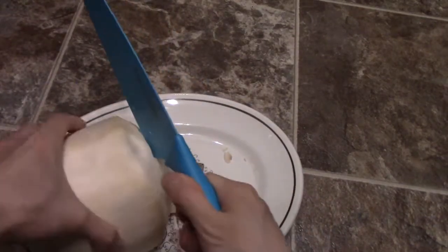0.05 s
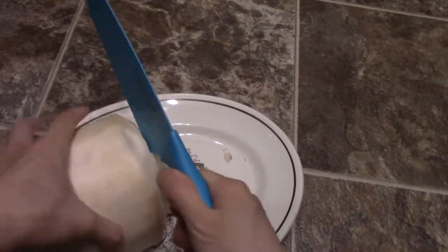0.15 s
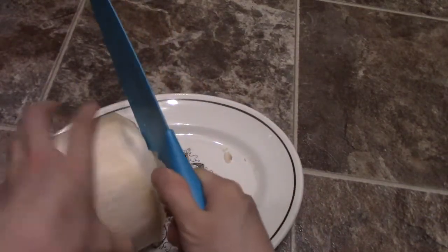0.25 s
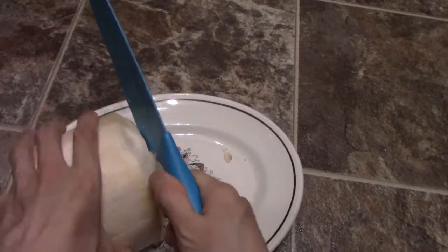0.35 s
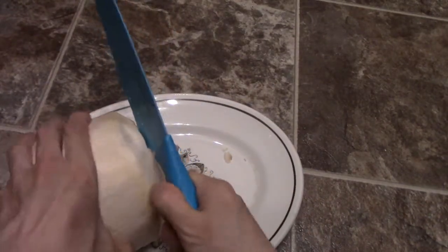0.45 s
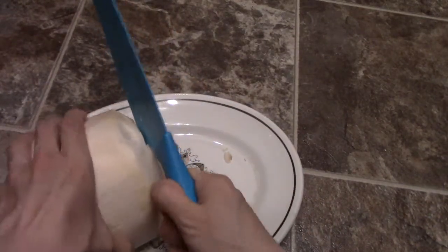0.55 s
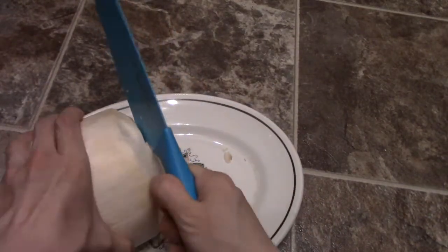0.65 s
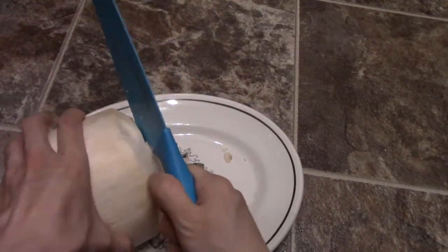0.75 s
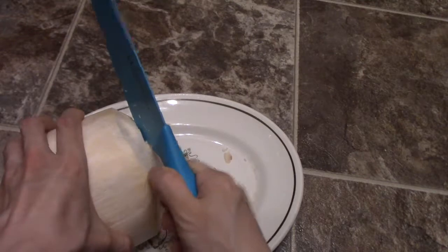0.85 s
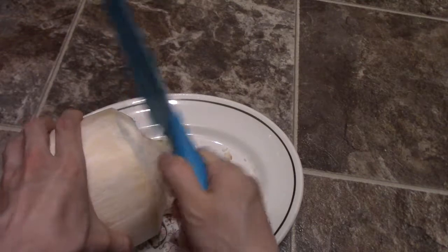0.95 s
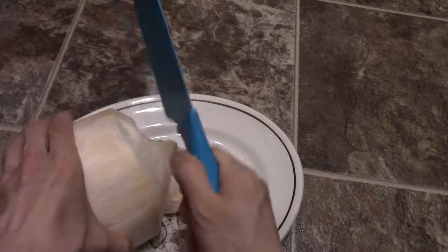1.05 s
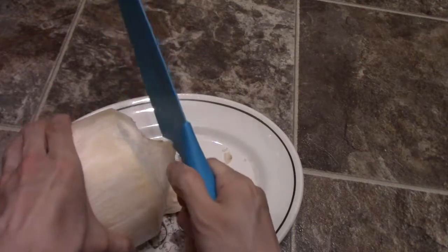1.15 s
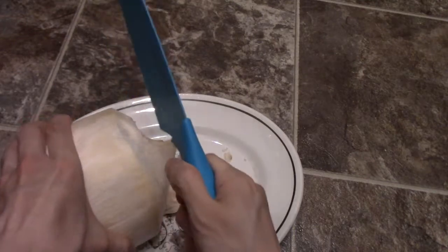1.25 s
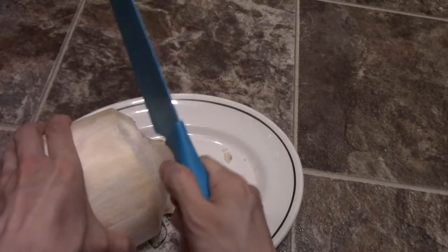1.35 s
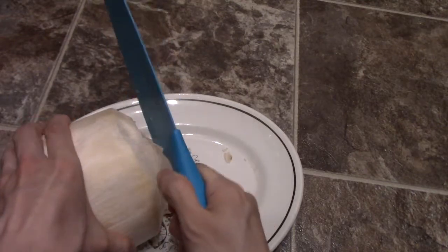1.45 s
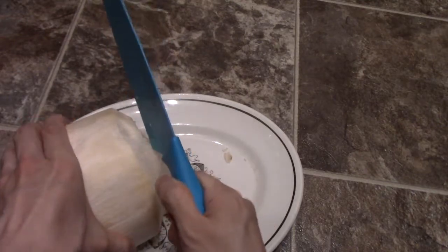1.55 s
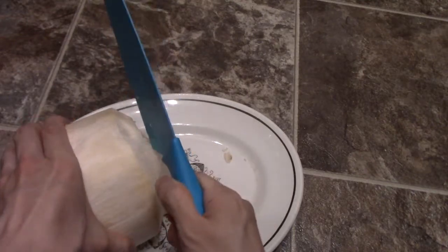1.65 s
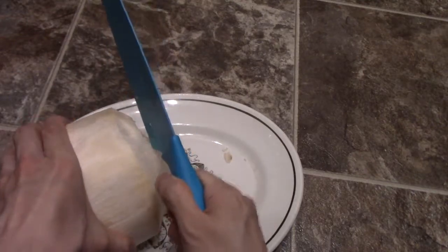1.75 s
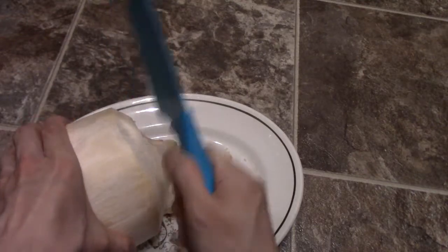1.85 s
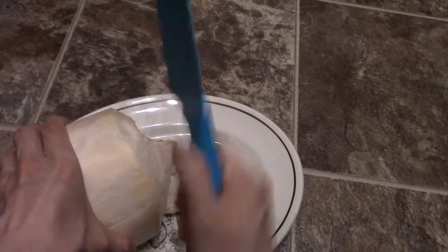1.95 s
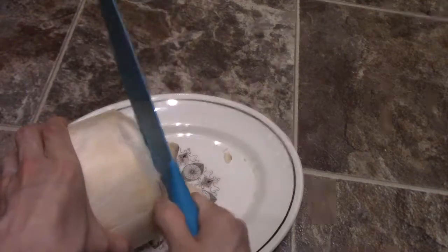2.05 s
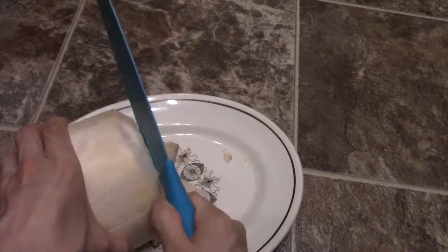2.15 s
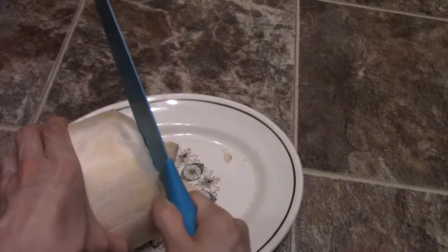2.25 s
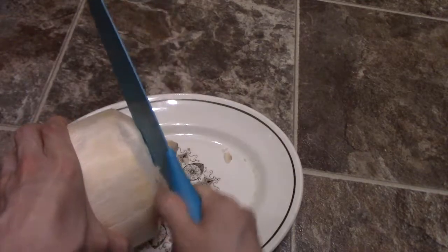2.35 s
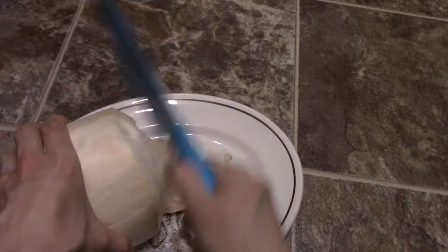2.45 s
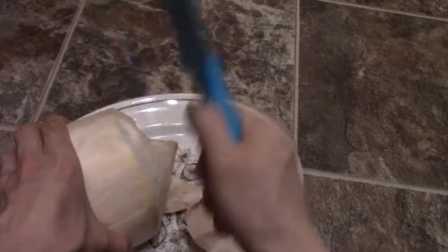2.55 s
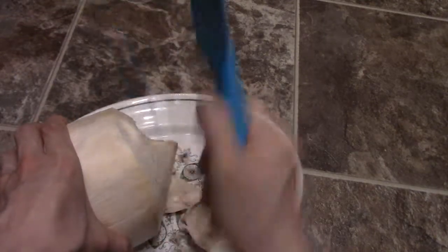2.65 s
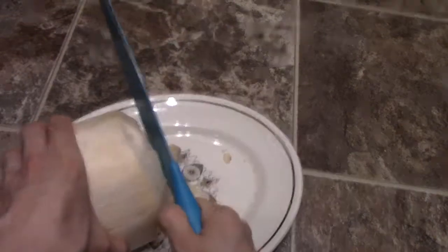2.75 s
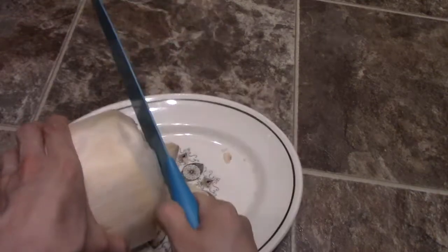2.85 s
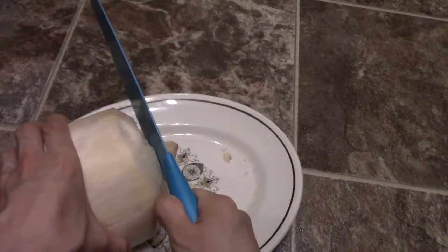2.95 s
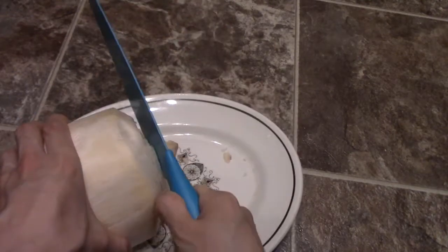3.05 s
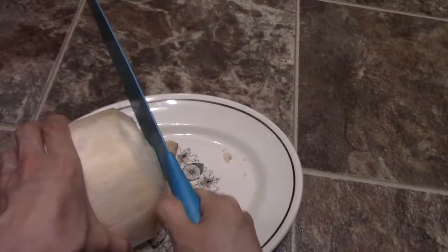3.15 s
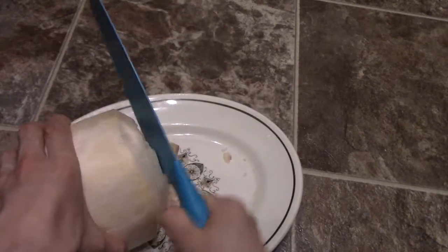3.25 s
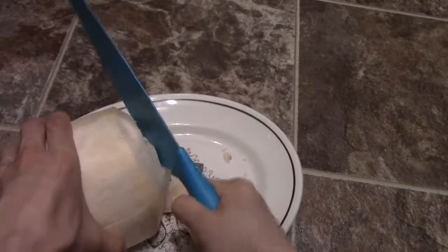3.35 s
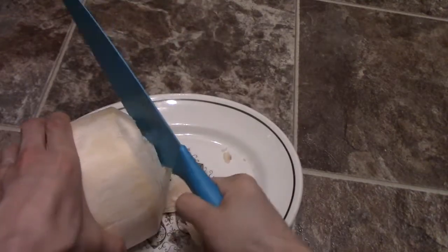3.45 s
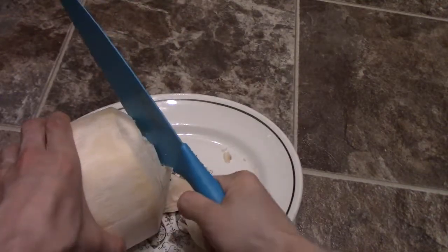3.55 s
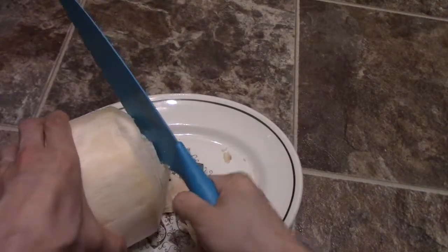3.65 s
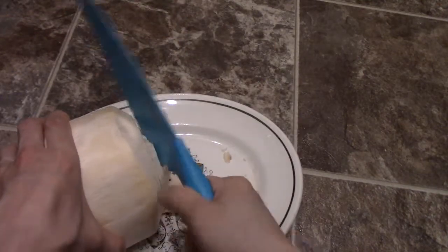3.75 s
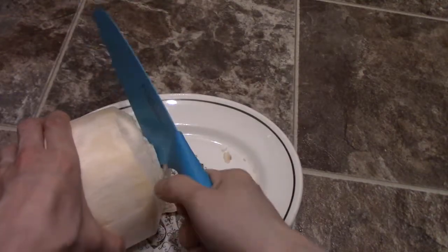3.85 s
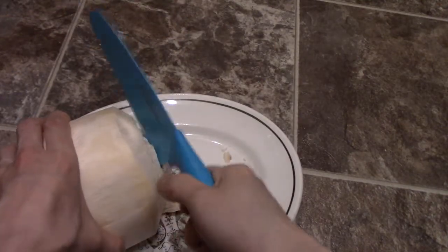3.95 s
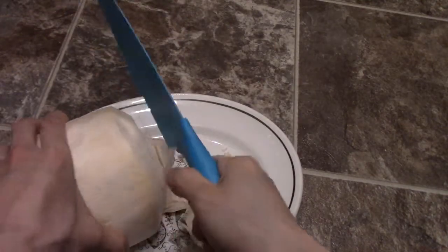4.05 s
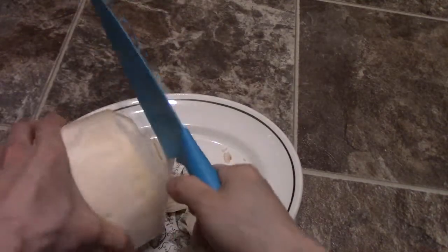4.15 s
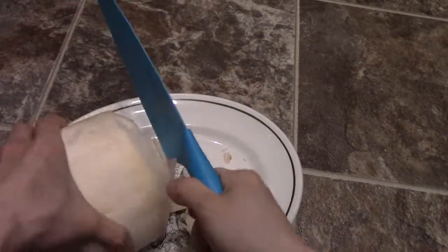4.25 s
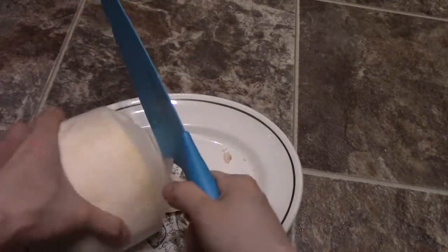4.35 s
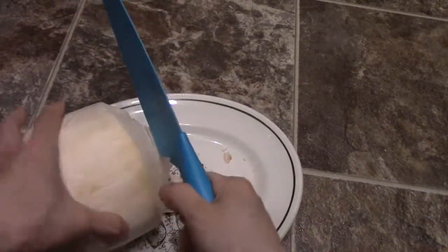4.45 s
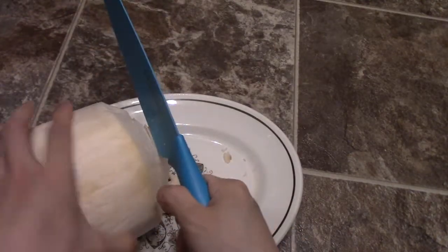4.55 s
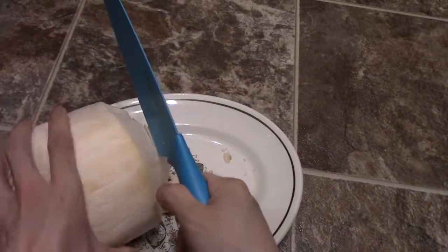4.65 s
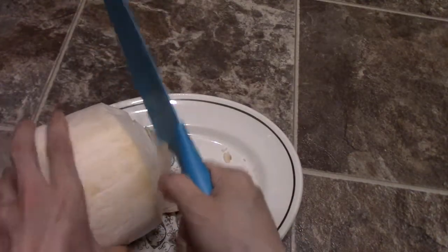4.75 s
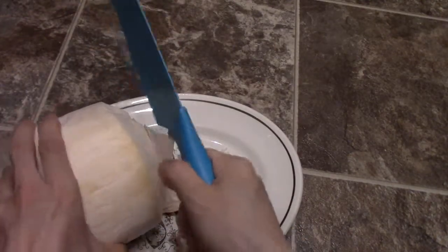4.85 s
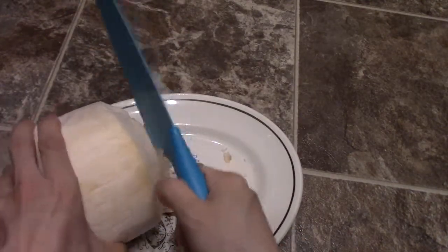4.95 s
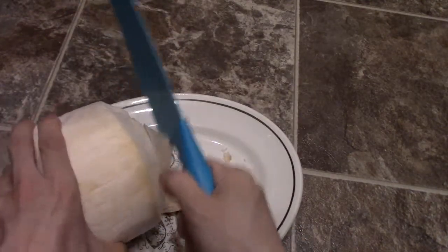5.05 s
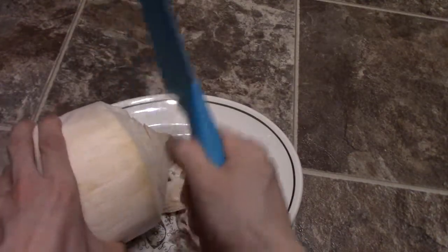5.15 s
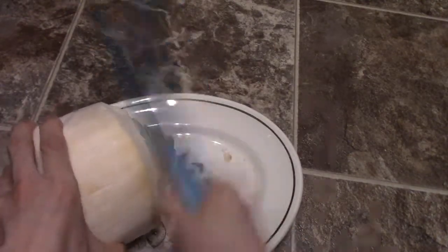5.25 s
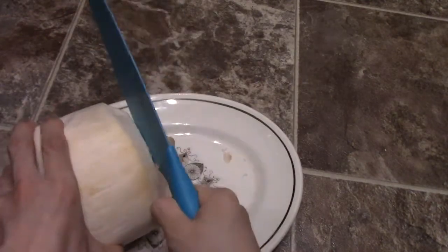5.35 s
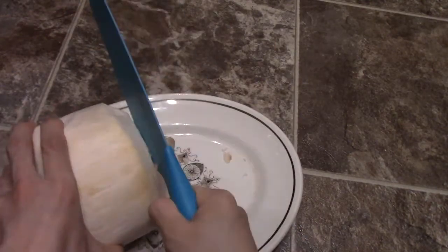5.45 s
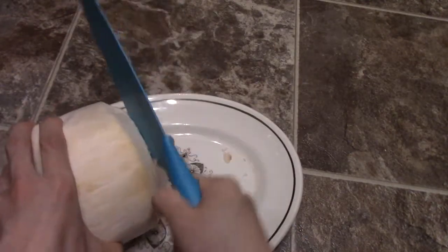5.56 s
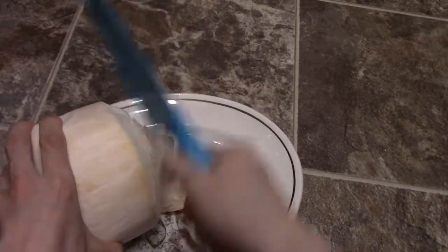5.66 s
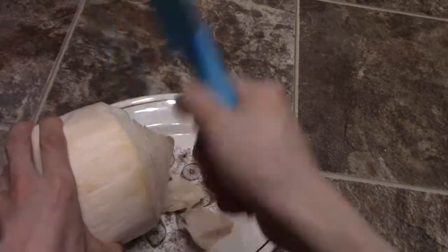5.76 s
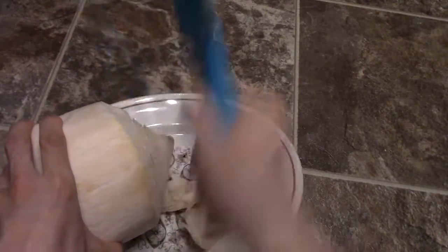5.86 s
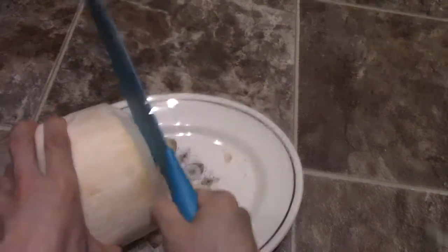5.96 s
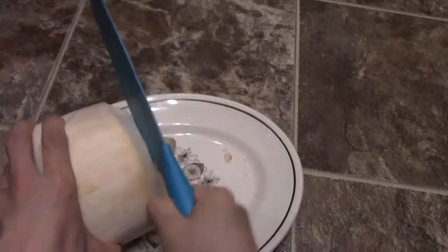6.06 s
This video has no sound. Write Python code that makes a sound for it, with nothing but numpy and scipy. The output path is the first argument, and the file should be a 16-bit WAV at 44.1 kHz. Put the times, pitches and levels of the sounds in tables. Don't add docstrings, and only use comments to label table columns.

```python
import sys
import numpy as np
from scipy import signal
from scipy.fft import rfft, irfft
from scipy.io import wavfile
from scipy.ndimage import uniform_filter1d

SR = 44100
rng = np.random.default_rng(int(sys.argv[2]) if len(sys.argv) > 2 else 0)


def boost(x):
    u = np.asarray(x, float) / 20
    return 10 ** u


def digitize_waveform(pressure):
    field = np.atleast_2d(pressure).T
    bounded = np.clip(field, -1, 1)
    quanta = np.round(bounded * 32767).astype(np.int16)
    wavfile.write(sys.argv[1], SR, quanta)


N = 268569

# t/s, bite time/s, cut length/s, delay until the nut lands on the plate/s
BLOWS = [
    (1.9565, .0035, .0045, .027),
    (2.67, .0006, .0085, .022),
    (5.2135, .005, .0065, .028),
    (5.8585, .005, .0065, .0275),
]
# tearing level/dB, cut tilt/dB per octave, room tail level/dB,
# tail tilt/dB per octave, share of the tail set off by the landing/0-1
FORCES = [(-6, 3, -21, 0.5, 0.3), (-6, 2.5, -19.5, 3, 0.17), (-3, 1.4, -12.5, -1.45, 0.3),
          (-3, 1.2, -7, -0.7, 0.68)]
# f/Hz, level/dB, t60/s
THUMPS = [
    [(80.3, -17, .25), (100.4, -8.5, 0.3), (138.3, -12.5, 0.29), (166.3, -2.5, 0.17), (306.7, -11.5, 0.19),
     (458.4, -14, 0.21), (589, -19.5, 0.14), (639, -19.5, .12), (390, -21.5, .2)],
    [(78, -16.5, .25), (94.5, -6, 0.32), (138.6, -9, 0.28), (168.6, -4.5, 0.16), (301, -18, .25),
     (334, -16.5, .18), (424.4, -19, 0.22), (479.4, -21, .25), (585, -28, 0.2)],
    [(96, -10.5, 0.33), (165.3, 3.5, 0.3), (236.4, -13, 0.31), (312.4, -6.5, 0.25), (358.5, -8.5, 0.21),
     (449, -8.5, 0.21), (484, -12.5, 0.23), (398, -12.5, 0.21), (529, -11, 0.14)],
    [(100.4, -9, 0.29), (165.5, 4.5, 0.26), (244, -14, 0.29), (305.5, -2, 0.19), (377, -8.5, 0.29),
     (434.5, -3, 0.23), (481, -9, 0.25), (529.5, -7, 0.16), (587, -14, 0.24), (339.5, -11, .2)],
]
# f/Hz, level/dB, t60/s
PLATES = [
    [(1046, -6, 0.087), (1550, -2.5, 0.071), (2028, -8, 0.29), (1874, -11, .1), (2186, -14, .2),
     (2690, -15, 0.13)],
    [(1173, -19, 0.263), (1764, -9, 0.21), (1960, -13, .25), (2030, -7, 0.26), (2105, -8, 0.24),
     (1475, -12.5, .25), (2503, -14, .2), (3000, -12.5, 0.14)],
    [(960, 0, 0.16), (1230, -17, 0.56), (1566, 4, 0.16), (1728, -6, 0.21), (2026, -7, 0.4),
     (3050, -17, 0.24), (4160, -14, .15)],
    [(1210, -8, 0.42), (1416, 4, 0.15), (1700, -0.5, 0.29), (2028, 2.5, 0.32), (2900, -19, 0.33),
     (4050, -14, 0.2), (980, 0, .2), (1580, -1, .2)],
]
# f/Hz, level/dB per Hz
TEAR_SPECTRUM = [(290, -24), (500, -24), (834, 4), (1890, -1), (4170, -4.5), (4760, -8.5), (8420, -4.5),
                 (13200, -14.5), (14900, -20), (15800, -22.5), (16500, -32)]
# f/Hz, level/dB
BOOM_SPECTRUM = [(50, -38.5), (90, 1.5), (170, 11.5), (250, -8), (320, -4), (450, 1.5), (600, -13.5),
                 (900, -50)]
# f/Hz, level/dB per Hz
TAIL_SPECTRUM = [(350, -28.5), (600, -3), (1120, -10), (1560, -7.5), (1840, -15), (2000, -8), (3350, -18.5),
                 (6980, -18.5), (14200, -27.5), (15000, -33), (15600, -58.5)]
# f/Hz, t60/s
ROOM_DECAY = [(700, 0.27), (1800, 0.27), (4500, 0.26), (8000, 0.2), (11000, .165), (14000, 0.12),
              (16500, .07)]
# t/s, peak level/dB, centre f/Hz, t60/s
KNOCKS = [(1.9689, -14.5, 2360, 0.041), (1.975, -20, 5800, 0.033), (1.984, -19, 2000, 0.036),
          (2.674, -10, 9000, 0.02), (2.6766, -11.5, 2040, 0.033), (2.671, -12, 1550, 0.037),
          (2.6885, -21, 2500, .03), (2.683, -19, 2430, 0.044), (2.693, -28.5, 6160, 0.018),
          (5.218, -3, 2200, 0.013), (5.2426, -9.5, 1470, 0.057), (5.249, -15, 1100, .05),
          (5.864, 2, 4800, 0.0039), (5.869, -24, 4000, 0.022), (5.886, -14, 1420, 0.07),
          (5.8897, -7, 2000, 0.06), (5.891, -26, 6500, .04), (5.905, -30, 1900, .04),
          (5.919, -19, 1200, 0.046), (5.957, -27, 1500, 0.03), (6.078, -43.5, 8650, .12),
          (6.087, -36, 3000, 0.024)]
# t/s, peak level/dB, f/Hz, t60/s
CHINKS = [(2.6748, 3.5, 7700, 0.0027), (2.6925, -15.5, 6140, .03), (2.706, -20, 2000, .03),
          (2.7145, -17, 2050, .03), (2.728, -20, 2050, .04), (1.9755, -22, 5900, .02),
          (2.054, -54, 11500, .015), (5.232, -30, 9200, .06), (5.294, -44, 9200, .04),
          (5.293, -54, 13800, .03), (5.869, -30, 12200, .06), (5.872, -32, 14000, .06),
          (5.872, -29, 9300, .09), (5.8695, -23, 5500, .02), (5.8945, -11, 1600, .04),
          (5.908, -36, 9300, .06), (5.908, -44, 13200, .03), (5.929, -40, 9300, .04),
          (5.9395, -34, 9300, .045), (5.939, -49, 13600, .05), (5.957, -39, 8000, .02),
          (6.083, -35, 3500, .06), (3.897, -54, 10500, 0.044), (3.9, -53, 5600, .04),
          (4.132, -50, 5200, .03), (4.128, -50, 2500, .05), (4.158, -59, 9500, .12),
          (.5695, -61, 9070, .06)]
# t/s, peak level/dB, note level against the click/dB, note f/Hz, note t60/s
TOUCHES = [(0.2345, -46, 9, 2160, 0.079), (0.2623, -36.5, -6, 3900, .04), (1.1994, -53, -1, 2130, .015),
           (1.4294, -59, 9, 4160, .04), (2.054, -48, 0, 2640, .02), (3.1233, -55, 11, 3000, .006),
           (3.2731, -18.5, -11, 2780, 0.0079), (3.4109, -32, -9, 2700, 0.011), (3.42, -33, -4, 2800, .012),
           (3.4285, -31.5, -8, 2720, 0.011), (3.6496, -34, 5, 1500, 0.0028),
           (3.6504, -37.5, 3, 3930, 0.0071), (3.723, -43, -1, 4040, 0.074), (3.7894, -52.5, 7, 2150, .015),
           (4.0728, -42.5, 3.5, 2400, 0.011), (4.152, -52, 4, 2560, .015), (4.335, -62, 8, 3900, 0.057),
           (4.906, -39, -7, 3880, .12), (4.934, -51, -2, 3880, .03), (5.3965, -47, -6, 2260, .02),
           (5.4595, -50, 12, 4480, .004), (6.018, -47, 2, 2100, .015)]
# t/s, peak level/dB, centre f/Hz
SNAPS = [(0.503, -51, 11500), (0.5114, -51, 10000), (2.922, -53, 9140), (0.8124, -50, 8930),
         (0.8274, -50, 9430), (1.498, -53, 10500), (1.912, -48, 7340), (2.2518, -50.5, 9050),
         (2.2843, -50, 9560), (2.2956, -46, 9400), (2.3064, -33, 10100), (2.3352, -49, 8840),
         (2.3803, -43, 8790), (2.967, -50, 12500), (3.2095, -43, 9500), (3.259, -43, 12800),
         (3.276, -30, 9550), (3.3283, -39.5, 7540), (3.4944, -44, 8750), (3.5084, -46, 9300),
         (3.656, -36, 6800), (4.294, -47, 7700), (4.4286, -55, 10500), (4.561, -53.5, 9460),
         (5.469, -51, 9500), (5.498, -49, 9600), (5.5189, -43, 6950), (5.5874, -54, 8940),
         (.2688, -50, 12500), (.7408, -55, 9000), (2.3212, -50, 9000), (2.4659, -60, 12500),
         (2.5078, -55, 9500), (2.5732, -56, 9500), (2.9932, -53, 9000), (3.1503, -51, 9500),
         (3.2541, -43, 8500), (3.2805, -40, 12500), (3.3803, -55, 8500), (3.4606, -50, 8500),
         (3.4736, -52, 8500), (3.6567, -46, 13500), (3.7839, -58, 13000), (3.8662, -55, 8500),
         (3.9026, -50, 10000), (4.1571, -52, 9000), (4.326, -55, 10000), (4.5097, -55, 10500),
         (4.636, -52, 8500), (4.9323, -52, 10970), (6.0458, -53, 9000)]
# middle t/s, level/dB, centre f/Hz, length/s
SWISHES = [(0.155, -64.5, 5000, 0.16), (0.252, -50.5, 5700, 0.033), (0.253, -50, 2070, 0.044),
           (.36, -62.5, 4500, 0.074), (0.821, -65, 9500, 0.034), (0.989, -68, 9000, 0.037),
           (2.36, -54.5, 8800, 0.022), (3.148, -64, 8500, 0.035), (3.238, -56, 8500, 0.051),
           (3.289, -49, 7360, 0.032), (3.418, -59, 9000, 0.02), (3.493, -67, 9000, 0.045),
           (3.652, -45, 1780, 0.011), (3.715, -56.5, 7900, 0.062), (3.896, -59, 10400, 0.022),
           (4.051, -57.5, 5530, 0.14), (4.076, -47.5, 7460, 0.0081), (4.101, -54, 1540, 0.081),
           (4.175, -64, 8400, 0.046), (4.295, -64, 8000, 0.068), (4.388, -65.5, 7900, .06),
           (4.17, -74, 14500, .08), (4.39, -73, 14500, .08), (.14, -72, 14500, .05),
           (4.908, -55, 9000, 0.0099), (4.92, -65, 7000, 0.035), (5.473, -56, 4800, 0.029),
           (5.548, -57, 8300, 0.05)]
# t/s, level/dB, dullness/0-1
RUB = [(0.0, -75, 0.3), (.23, -70, .8), (.94, -76.5, .1), (1.93, -75, 0.2), (2.64, -76, 0.56),
       (3.35, -71.5, 0.24), (4.2, -75, 1), (5.19, -77.5, 0.37), (6.0, -77, .5), (6.09, -60, .6)]
# t/s, peak level/dB, f/Hz
SHOVES = [(0.266, -65, 72.7), (1.518, -66, 83.4), (2.229, -63, 87), (2.358, -68, 106), (2.933, -64, 83.3),
          (4.084, -57, 90), (4.923, -53, 90), (5.58, -64, 96)]
# multiple of the motor speed, rms level/dB
MOTOR_ORDERS = [(1, -54), (2, -46), (3, -63), (4, -58.5), (5, -68.5)]
# f/Hz, rms level/dB
MAINS = [(60, -84), (120, -59.5)]
# f/Hz, level/dB per Hz
FAN_SPECTRUM = [(18, -36), (30, -34.5), (95, -17.5), (118, -15), (194, -12), (221, -9), (252, -5),
                (355, -10.5), (473, -3), (632, -16), (1220, -22.5), (2830, -30), (5740, -41.5),
                (13000, -54), (16000, -69)]
# f/Hz, width/Hz, rms level/dB
CASE = [(190.3, 3.2, -56.5), (313.6, 16, -51), (360, 8.2, -58.5), (461.6, 21, -50.5), (971, 83.4, -57),
        (1253.6, 19, -63), (1468, 39, -66), (1690, 72, -63.5), (2000, 18, -69.5), (5725, 140, -75),
        (5460, 950, -68), (9070, 80, -82.5)]
# f/Hz, likeness/0-1
NUT_SAME = [(60, 1), (125, .9996), (500, 1), (2000, 0.99), (4000, 0.96), (8000, 0.975), (16000, 0.86)]
# f/Hz, likeness/0-1
FRIDGE_SAME = [(60, 1), (180, 0.99), (550, 1), (1650, 0.95), (4970, 0.89), (15000, 0.76)]
# f/Hz, side level/dB
NUT_LEAN = [(60, -37.5), (500, -44), (2000, -33.5), (8000, -26), (15000, -28.5)]
# f/Hz, side level/dB
FRIDGE_LEAN = [(60, -33), (15000, -34)]


def evened(x):
    return x / np.sqrt(np.mean(x ** 2) + 1e-20)


def read(points, hz):
    f, value = np.transpose(points)
    return np.interp(np.log(hz + 1), np.log(f + 1), value)


def add(mix, s, sound):
    part = mix[..., max(round(s * SR), 0):][..., :sound.shape[-1]]
    part += sound[..., :part.shape[-1]]


def colour(x, spectrum):
    gain = boost(read(spectrum, np.fft.rfftfreq(len(x), 1 / SR)))
    return irfft(rfft(x) * gain, len(x))


def resonate(x, hz, width):
    r = np.exp(-np.pi * width / SR)
    return signal.lfilter([1, 0, -1], [1, -2 * r * np.cos(2 * np.pi * hz / SR), r * r], x)


def ring(modes, t, rise, wobble=0.):
    hz, db, t60 = np.transpose(modes)[:, :, None]
    steps = rng.standard_normal((2, len(modes), len(t) // 512 + 2))
    frame = np.arange(len(t)) / 512
    drift = np.array([np.interp(frame, np.arange(len(a)), a) for a in steps[0] + 1j * steps[1]])
    tones = np.exp(2j * np.pi * (hz * t + rng.random(hz.shape)))
    waves = boost(db - 60 * t / t60) * (tones * (1 + wobble * drift)).imag
    return waves.sum(0) * (1 - np.exp(-t / rise)) ** 2


def blow(row, force, thump, plate):
    s, bite, length, landing = row
    tear_db, cut_tilt_db, tail_db, tilt_db, share = force
    t = np.arange(SR * 2 // 3) / SR

    spikes = rng.standard_normal(len(t)) * boost(1.5 * rng.exponential(1, len(t)).clip(0, 3))
    tilt = [(500, -2 * cut_tilt_db), (16000, 3 * cut_tilt_db)]
    tear = evened(colour(colour(spikes, TEAR_SPECTRUM), tilt))
    cutting = np.minimum(t / bite, 1) ** 2 * np.exp(-np.maximum(t - length, 0) / 0.0016)
    out = boost(tear_db - 5.0) * tear * cutting

    floor = [mode for mode in thump if mode[0] < 250]
    tiles = [mode for mode in thump if mode[0] >= 250]
    stop = boost(2.5) * ring(floor, t, 0.0023, 0.24)
    stop_tail = boost(tail_db) * (1 - share) * room_tail(t, tilt_db, 0.0016)
    add(out, 0.79 * length, stop + stop_tail)

    boom_db = -3.5 + 0.5 * tail_db
    boom = evened(colour(rng.standard_normal(len(t)), BOOM_SPECTRUM))
    boom = boost(boom_db - 60 * t / 0.33) * boom * np.minimum(t / 0.0023, 1)
    nut = boost(1) * ring(tiles, t, 0.0025, 0.6)
    upper = nut + boost(-18) * ring(plate, t, 0.001374, 0.3) + boom
    add(out, length, 0.33 * upper)
    landing_tail = boost(tail_db) * share * room_tail(t, tilt_db - 3.0, 0.0024)
    add(out, landing, upper + landing_tail)
    return s, out


def room_tail(t, tilt_db, rise):
    hz, frame_s, z = signal.stft(rng.standard_normal(len(t)), SR, nperseg=128)
    lumps = uniform_filter1d(rng.standard_normal(z.shape), size=9, axis=0)
    lumps = evened(uniform_filter1d(lumps, size=2, axis=1))
    shape_db = read(TAIL_SPECTRUM, hz) + tilt_db * np.log2(np.maximum(hz, 500) / 2000)
    fade_db = 60 * frame_s / 1.024 / read(ROOM_DECAY, hz)[:, None]
    z = z * boost(shape_db[:, None] + 2.2 * lumps - fade_db)
    tail = signal.istft(z, SR, nperseg=128)[1][:len(t)]
    return tail / np.std(tail[:SR // 50]) * (1 - np.exp(-t / rise))


def knock(s, db, hz, t60):
    t = np.arange(SR // 8) / SR
    noise = rng.standard_normal(len(t))
    band = evened(resonate(resonate(noise, hz, .5 * hz), hz, 1.2 * hz))
    return s, boost(db + 0.5 - 60 * t / max(t60, .005)) * band * np.minimum(t / .0007, 1)


def chink(s, db, hz, t60):
    t = np.arange(SR // 10) / SR
    t60 = max(t60, .003)
    drive = rng.standard_normal(len(t)) * boost(-60 * t / (.45 * t60))
    rough = resonate(resonate(drive, hz, 3.2 / t60), hz, 900.)
    return s, boost(db - 3.5) * rough / abs(rough).max()


def touch(s, db, note_db, note_hz, note_t60):
    return tick(s, db, 9000, note_db, note_hz, note_t60)


def snap(s, db, hz):
    return tick(s, db, hz, -18, 2400, 0.053)


def tick(s, db, hz, low_db, low_hz, low_t60):
    t = np.arange(SR // 12) / SR
    a, b = rng.standard_normal((2, len(t)))
    click = a * (boost(-60 * t / 0.0065) + boost(-26.0 - 60 * t / 0.15))
    bright = resonate(resonate(resonate(click, hz, 4500.0), hz, 4700.0), 0.76 * hz, 8000.)
    low = resonate(b * boost(-60 * t / 0.011), low_hz, 2.0 / max(low_t60, .003) + 60.0)
    wide = resonate(click, 3000.0, 4000.)
    out = bright / abs(bright).max()
    out = out + boost(min(low_db, 9) - 1.0) * low / abs(low).max()
    out = out + boost(min(low_db, 0) - 5.0) * wide / abs(wide).max()
    return s, boost(db + 1.0) * out


def swish(s, db, hz, length):
    t = np.arange(-SR // 5, SR // 5) / SR
    grains = rng.standard_normal(len(t)) * boost(4.4 * rng.exponential(1, len(t)).clip(0, 4))
    band = evened(resonate(resonate(grains, hz, 0.65 * hz), hz, 1.2 * hz))
    band = band + boost(-13.5) * evened(resonate(grains, 13500., 5000.))
    rub = boost(db) * band * np.exp(-2 * (t / length) ** 2)
    start = max(round(-(s + t[0]) * SR), 0)
    return s + t[start], rub[start:]


def rubbing():
    crackle = (rng.random(N) < 2500. / SR) * boost(2.6 * rng.exponential(1, N).clip(0, 4))
    crackle = crackle * rng.standard_normal(N)
    grains = evened(crackle) + 1.3 * rng.standard_normal(N)
    bright = resonate(resonate(grains, 8200.0, 5130.0), 9700.0, 7000.)
    bright = evened(resonate(bright, 8760.0, 8970.0))
    dull = evened(resonate(grains, 4000., 4200.0))
    airy = boost(-10.5) * evened(resonate(grains, 14000., 4000.))
    t = np.arange(N) / SR
    s, db, dullness = np.transpose(RUB)
    dull_share = 1.11 * np.interp(t, s, dullness) ** 2
    return boost(np.interp(t, s, db)) * (bright + dull_share * dull + airy)


def shove(s, db, hz):
    t = np.arange(SR // 3) / SR
    return s - .01, ring([(hz, db + 28.5, .2)], t, .016, 0.46)


def slow(rate_hz):
    t = np.arange(0, N + 256, 256) / SR
    rates = np.geomspace(.2, rate_hz, num=24)
    waves = sum(np.sin(2 * np.pi * (f * t + rng.random())) / np.sqrt(f) for f in rates)
    return np.interp(np.arange(N) / SR, t, evened(waves))


def fridge():
    motor_hz = 130.2
    turns = np.cumsum(motor_hz * (1 + 0.0019 * slow(3.0))) / SR
    hum = np.zeros(N)
    for k, db in MOTOR_ORDERS:
        hum += boost(db + 0.5 * slow(4.2)) * np.sin(2 * np.pi * (k * turns + rng.random()))
    for hz, db in MAINS:
        hum += boost(db) * np.sin(2 * np.pi * hz * np.arange(N) / SR)
    wash = boost(-44 + 0.5 * slow(2.4)) * evened(colour(rng.standard_normal(N), FAN_SPECTRUM))
    drive = rng.standard_normal(N)
    case = sum(boost(db) * evened(resonate(resonate(drive, hz, w), hz, 2 * w)) for hz, w, db in CASE)
    return np.sqrt(2) * hum + wash + case


def widen(x, same, lean):
    hz, _, z = signal.stft(x, SR, nperseg=256)
    likeness = np.clip(read(same, hz), 0, 1)[:, None]
    scramble = np.exp(2j * np.pi * rng.random(z.shape)) * (hz > 0)[:, None]
    z = z * np.sqrt((1 - likeness) / (1 + likeness)) * scramble
    side = np.sqrt(2) * signal.istft(z, SR, nperseg=256)[1][:N] + colour(x, lean)
    return np.array([x + side, x - side])


def scene():
    nut = rubbing()
    for parts in zip(BLOWS, FORCES, THUMPS, PLATES):
        add(nut, *blow(*parts))
    sources = ((knock, KNOCKS), (chink, CHINKS), (touch, TOUCHES), (snap, SNAPS), (swish, SWISHES), (shove, SHOVES))
    for source, table in sources:
        for row in table:
            add(nut, *source(*row))
    nut = signal.sosfilt(signal.butter(3, 58., "high", fs=SR, output="sos"), nut)
    return widen(nut, NUT_SAME, NUT_LEAN) + widen(fridge(), FRIDGE_SAME, FRIDGE_LEAN)


def roll_off(x):
    return signal.sosfilt(signal.butter(12, 16650, fs=SR, output="sos"), x)


def record(dry):
    dry = signal.sosfilt(signal.butter(2, 52., "high", fs=SR, output="sos"), dry)
    peak_db = 20 * np.log10(abs(dry).max(0) + 1e-6)
    fall = np.arange(N) * 200. / SR
    over_db = np.maximum(np.maximum.accumulate(peak_db + fall) - fall + 3.0, 0)
    held = dry / boost(.9 * uniform_filter1d(over_db, size=48))
    treble_edge = signal.firwin(255, 16150, window=("kaiser", 9), fs=SR)
    mix = signal.oaconvolve(np.clip(held, -.98, .98), treble_edge[None], "same")
    return roll_off(mix)


dry = scene()
out = record(dry)
digitize_waveform(out)
```